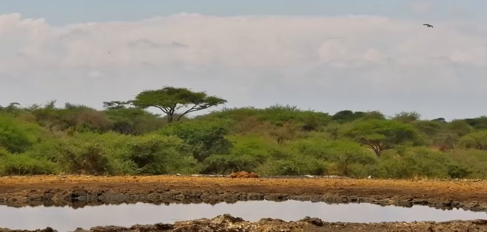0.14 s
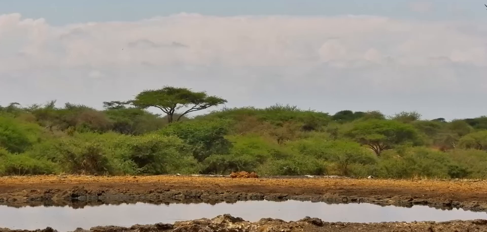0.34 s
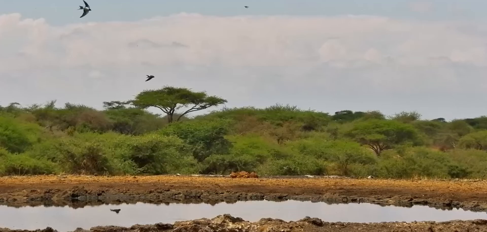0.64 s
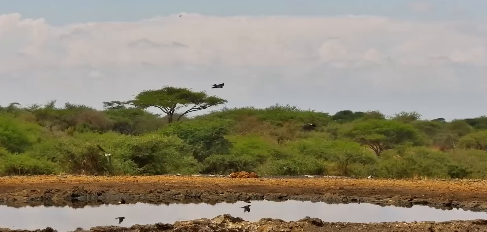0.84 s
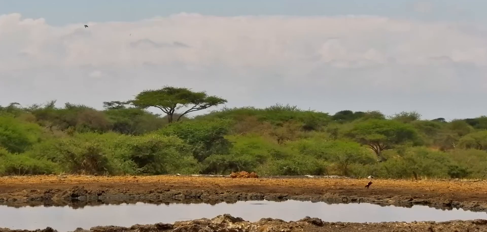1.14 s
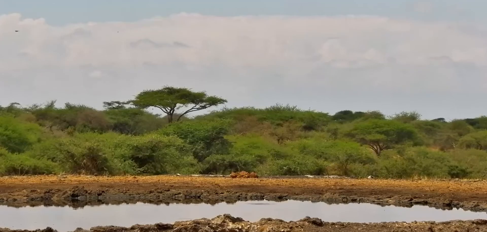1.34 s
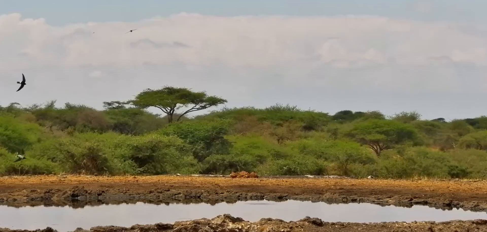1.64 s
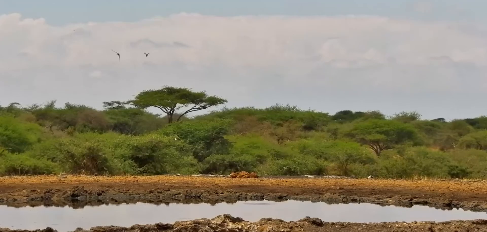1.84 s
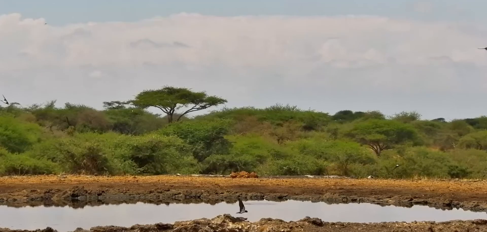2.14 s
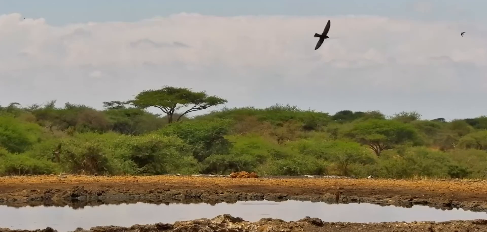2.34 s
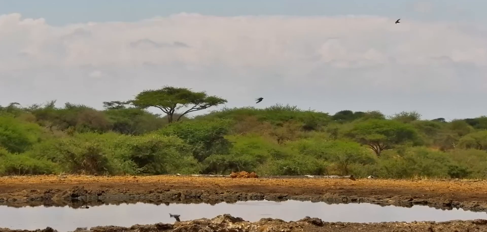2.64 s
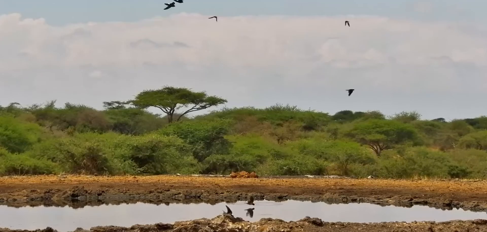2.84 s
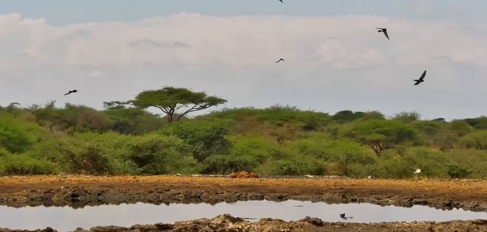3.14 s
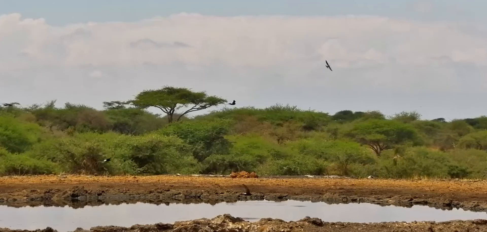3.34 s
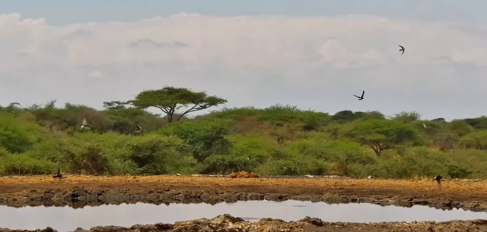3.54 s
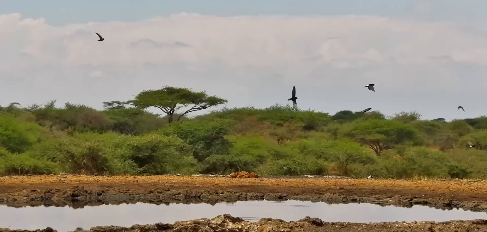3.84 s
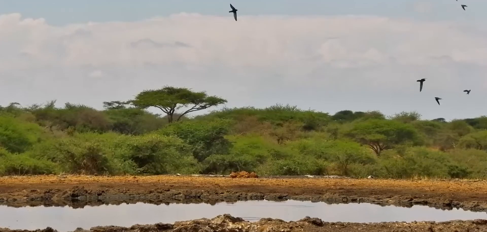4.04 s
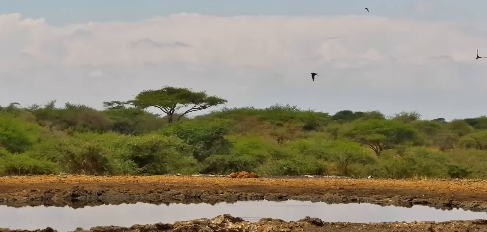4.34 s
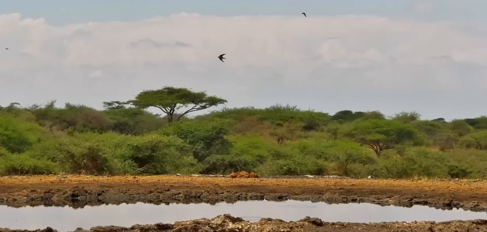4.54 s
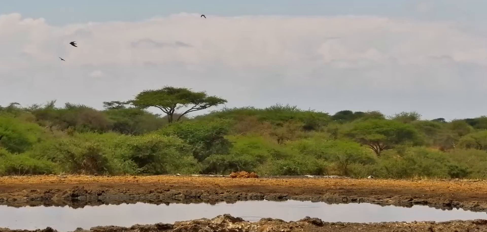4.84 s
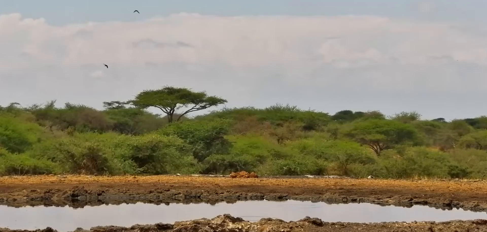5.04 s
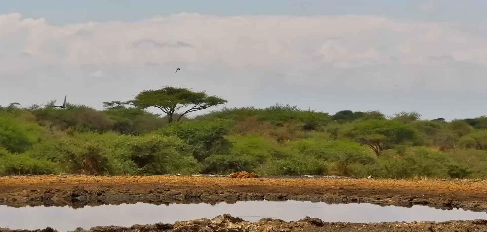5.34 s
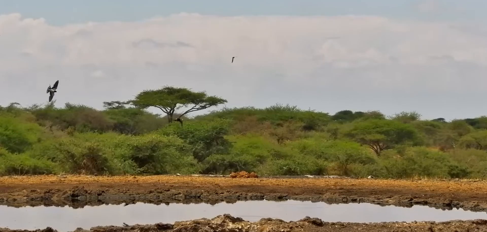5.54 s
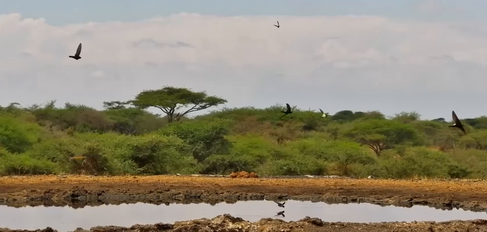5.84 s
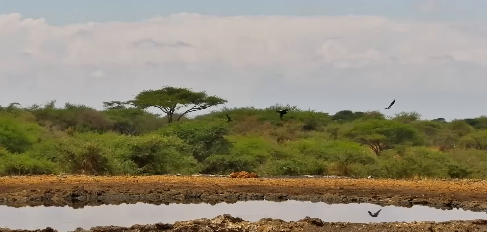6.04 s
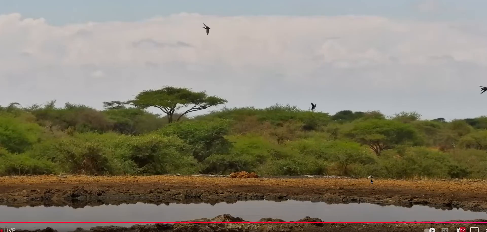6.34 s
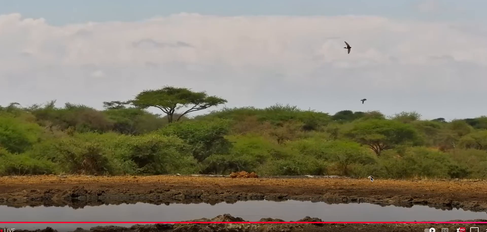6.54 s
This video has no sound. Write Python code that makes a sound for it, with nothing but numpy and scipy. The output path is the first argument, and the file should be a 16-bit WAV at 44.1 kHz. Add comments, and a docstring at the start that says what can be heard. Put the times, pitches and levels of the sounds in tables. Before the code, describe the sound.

Small swifts dash past close by with shrill, falling trills and soft wing flutters, over a gentle outdoor hiss in open bush.

```python
"""A waterhole in open bush: small swifts dash past the microphone, trilling. Each trill is a run of short
whistled notes, many hooking down at the end, some pure, some rasping; ground and bushes scatter them back.
Wings flutter close by as soft pushes of shaped noise, with small ticks and a bump or two of breeze.
A far bird gives two hoarse calls from across the water, made of sliding sines with shaky pitch.
Under it all lie a soft outdoor hiss of filtered noise and a faint mains hum of steady sines."""
import sys
import numpy as np
from scipy import signal
from scipy.fft import rfft, irfft
from scipy.io import wavfile

SR = 44100
rng = np.random.default_rng(int(sys.argv[2]) if len(sys.argv) > 2 else 0)


def unload_audio(sound):
    """Save the sound as a 16-bit wav file, at the path given as the first command line argument."""
    columns = np.transpose(np.atleast_2d(sound))
    # keep every value between -1 and 1, then stretch to whole-number steps
    steps = np.round(np.clip(columns, -1, 1) * 32767)
    wavfile.write(sys.argv[1], SR, steps.astype(np.int16))


N = 294984
TIME = np.arange(N) / SR
# whole-scene spectra are shaped on a longer grid
SIZE = 2 ** 19
FREQS = np.arange(SIZE // 2 + 1) * SR / SIZE


def undb(db):
    """Decibels to gain."""
    return 10 ** (np.asarray(db) / 20)


def unit(x):
    """Scale to rms 1."""
    return x / np.sqrt(np.mean(x ** 2) + 1e-18)


def add(track, start, sound):
    """Mix a sound in at a time in seconds."""
    i = max(int(start * SR), 0)
    track[i:i + len(sound)] += sound[:N - i]


def curve(points, hz):
    """Gain of a spectrum of (Hz, dB) points at given frequencies."""
    knots, db = np.transpose(points)
    return undb(np.interp(np.log(np.maximum(hz, 1)), np.log(knots), db))


def bells(bands):
    """Gain of a set of (Hz, width Hz, dB) peaks and dips."""
    return undb(sum(db * np.exp(-2 * ((FREQS - hz) / width) ** 2) for hz, width, db in bands))


def coloured(points):
    """Noise of rms 1 with a spectrum of (Hz, dB) points."""
    spectrum = rfft(rng.standard_normal(SIZE)) * curve(points, FREQS)
    return unit(irfft(spectrum)[:N])


def wobble(rate_hz):
    """Smooth random drift of rms 1, with little movement faster than the rate."""
    spectrum = rfft(rng.standard_normal(SIZE)) / (1 + (FREQS / rate_hz) ** 4)
    return unit(irfft(spectrum)[:N])


def swell(length):
    """A rounded rise and fall over a length in seconds."""
    return np.hanning(max(int(length * SR), 8))


def puffs(table, colour):
    """Soft rounded pushes of air, as (start_s, length_s, level_db) swells of coloured noise."""
    gate = np.zeros(N)
    for start, length, db in table:
        add(gate, start, undb(db) * swell(length))
    return gate * coloured(colour)


def outdoor_hiss(sway_db=1.27, ripple_db=2.4, ripple_hz=60):
    """Outdoor noise, its spectrum finely rippled by reflections round the microphone."""
    # broad spectrum of the open air: pitch_hz, level_db
    air_colour = [(20, -9.5), (45, -4), (130, 3), (220, -9), (560, -3), (1400, -8), (1750, -9), (2150, -8),
                  (2650, -2.5), (3500, -8), (4300, -12), (6000, -8), (7800, -31), (8700, -17), (11300, -18),
                  (12400, -42)]
    # narrow bands that stand out in the hiss: pitch_hz, width_hz, level_db
    air_bands = [(455, 30, 6), (550, 50, 6), (740, 70, 3), (975, 40, 3), (1110, 90, 3), (1365, 50, 4),
                 (1450, 30, 4), (2540, 60, 3.5), (2660, 30, 3), (2770, 40, 3.5), (2860, 70, 3.5),
                 (3140, 40, 4)]
    # strength of the hiss, before the random sway: time_s, level_db
    air_level = [(0, -53.6), (5.6, -54.1), (6.15, -52.7), (6.69, -53.3)]
    knots = np.arange(0, SR / 2, ripple_hz)
    # the ripple deepens up to 4 kHz
    ripple = np.interp(FREQS, knots, rng.standard_normal(len(knots))) * np.minimum(FREQS / 4000, 1)
    spectrum = rfft(coloured(air_colour), SIZE) * bells(air_bands) * undb(ripple_db * ripple)
    air = unit(irfft(spectrum)[:N])
    level_db = np.interp(TIME, *np.transpose(air_level)) + sway_db * wobble(3.56)
    return air * undb(level_db)


def mains_hum():
    """Steady sines at multiples of the mains frequency, each from a random phase."""
    # partials of the hum: pitch_hz, level_db
    partials = [(50, -101), (150, -65.5), (250, -69.5), (350, -69)]
    return sum(undb(db) * unit(np.sin(2 * np.pi * (hz * TIME + rng.random()))) for hz, db in partials)


def ticks(decay_s=0.017):
    """Small clicks: noise that starts abruptly and dies within a twentieth of a second."""
    # click onsets: start_s, level_db
    tick_times = [(0.082, -51), (0.64, -40.5), (5.75, -52.5)]
    # spectrum of the clicks: pitch_hz, level_db
    tick_colour = [(1500, -47), (2700, 3), (3700, 0), (4800, -3), (6500, -12), (11000, -59)]
    gate = np.zeros(N)
    for start, db in tick_times:
        add(gate, start, undb(db) * np.exp(-TIME[:SR // 20] / decay_s))
    return gate * coloured(tick_colour)


def scatter(note, share, spread_s=.009, count=6):
    """A bird on the wing is heard over a few extra paths, different for each note."""
    lags = rng.random(count)
    paths = np.zeros(int(spread_s * SR) + 40)
    paths[(lags * spread_s * SR).astype(int) + 30] = rng.standard_normal(count) * np.exp(-lags)
    paths *= share / np.linalg.norm(paths)
    # the direct path
    paths[0] = 1
    heard = signal.fftconvolve(note, paths)
    return heard * np.linalg.norm(note) / np.linalg.norm(heard)


def whistles(notes, octave_db, knee=.62, attack_s=0.00066, fade=0.14, jitter_hz=25, rasp_hz=320,
             scoop_hz=80, break_rough=0.7, smear=1.0, hook_octave_db=5, flutter=.65, hook_db=-4.5):
    """Each note glides, then hooks as the syrinx lets go; low pitches bring the octave into the throat's band."""
    # knee and fade are shares of a note; flutter is the strength shake of a fully rough note (natural log)
    # throat and beak pass the middle of the whistle best: pitch_hz, level_db
    throat = [(2000, -20), (2600, 3), (3300, -1.5), (4200, 2), (5200, 10.5), (6200, 2.5), (7000, -24),
              (7800, -19.5), (10500, -13), (12000, -24)]
    out = np.zeros(N)
    jitter, shimmer = wobble(450), np.tanh(wobble(700))
    for start, length, open_hz, mid_hz, close_hz, db, rough in notes:
        t = np.arange(int(length * SR)) / SR
        u = t / length
        here = slice(int(start * SR), int(start * SR) + len(t))
        hook = np.clip((u - knee) / (1 - knee), 0, 1)
        # the glide meets the opening pitch 18 % in and the middle pitch 52.5 % in
        glide = (np.minimum(u, knee) - .18) / 0.345
        hz = open_hz + (mid_hz - open_hz) * glide + (close_hz - mid_hz) * hook
        # the pitch scoops up as pressure builds
        hz = hz - scoop_hz * np.exp(-t / attack_s)
        # unsteady membranes shake both pitch and strength
        unsteady = np.minimum(rough + break_rough * hook, 1)
        shaken_hz = hz + (jitter_hz + rasp_hz * unsteady) * jitter[here]
        phase = 2 * np.pi * np.cumsum(shaken_hz) / SR
        attack = np.sin(np.pi / 2 * np.minimum(t / attack_s, 1)) ** 2
        effort = attack * np.clip((1 - u) / fade, 0, 1)
        effort = effort * np.exp(flutter * unsteady * shimmer[here]) * undb(hook_db * hook)
        fundamental = curve(throat, hz) * np.sin(phase)
        octave = undb(octave_db + hook_octave_db * hook) * curve(throat, 2 * hz) * np.sin(2 * phase)
        voice = fundamental + octave
        add(out, start, undb(db) * scatter(unit(effort * voice), smear * (rough + 0.6)))
    return out


def trill_notes(stray_pitch=0.0058, stray_db=0.58):
    """Most trills speed up as they run out; many turn from falling hooks towards level or rising slurs."""
    # one trill a row; gap, lead and hook blend from the first note to the last: start_s, end_s,
    # first_gap_s, last_gap_s, sounding_share_of_gap, first_lead, last_lead, first_hook, last_hook, roughness (0-1)
    # lead and hook are a note's opening and closing pitch as ratios to its middle pitch
    trill_rows = [(0.676, 1.188, .0478, .0262, .6, 1.02, 1.04, .78, .92, .28),
                  (0.813, 0.928, .0398, .0358, .42, 1.0, .99, .9, .95, .12),
                  (1.399, 1.873, .0517, .0273, .47, 1.06, .96, .64, 1.02, .2),
                  (2.263, 2.371, .055, .0505, .52, 1.11, .92, .66, .66, .2),
                  (2.42, 2.684, .044, .0215, .4, .97, 1.0, .6, .95, .2),
                  (3.017, 3.364, .0541, .0326, .4, 1.05, .94, .62, .9, .22),
                  (3.038, 3.272, .0569, .0338, .48, 1.0, 1.01, .96, .98, .25),
                  (3.176, 3.788, .0622, .0273, .52, 1.02, .88, .78, 1.02, .33),
                  (4.714, 4.999, .0572, .0355, .28, 1.12, .93, .85, .97, .22),
                  (5.208, 5.364, .038, .0413, .24, .98, .96, 1.03, 1.05, .12)]
    # one course per trill, same order: pitch mostly sinks as the breath runs out, level follows the fly-by
    # time_s, pitch_hz, level_db
    courses = [
        [(0.675, 4920, -32.5), (0.76, 4837, -26), (0.81, 4550, -50), (1.0, 4100, -37), (1.186, 3530, -50)],
        [(0.812, 3680, -37), (0.927, 3430, -39.5)],
        [(1.399, 4120, -33), (1.452, 4390, -24.5), (1.5, 4300, -26), (1.585, 4000, -30), (1.635, 3970, -24),
         (1.705, 3977, -23.5), (1.745, 3740, -30.5), (1.84, 3744, -28.5), (1.873, 3680, -35)],
        [(2.263, 3950, -27), (2.319, 4060, -31), (2.371, 4120, -25)],
        [(2.42, 4896, -15.5), (2.504, 4603, -21), (2.545, 4200, -27), (2.684, 3625, -27.5)],
        [(3.017, 4430, -31.5), (3.07, 4580, -26), (3.216, 3880, -33.5), (3.364, 3720, -39.5)],
        [(3.038, 5270, -36), (3.099, 4740, -30.5), (3.19, 4840, -32), (3.272, 4760, -32)],
        [(3.176, 4866, -29.5), (3.238, 4790, -31), (3.35, 4710, -31), (3.46, 4100, -37), (3.6, 3856, -39.5),
         (3.73, 3970, -38.5), (3.788, 3810, -48.5)],
        [(4.714, 3820, -45.5), (4.827, 3560, -39), (4.872, 3660, -48.5), (4.999, 3560, -52)],
        [(5.208, 4630, -30.5), (5.246, 4330, -35.5), (5.283, 4240, -35.5), (5.364, 3520, -52)],
    ]
    notes = []
    for row, course in zip(trill_rows, courses):
        start, end, first_gap, last_gap, share, *ratios, rough = row
        first_lead, last_lead, first_hook, last_hook = ratios
        times, pitches, levels = np.transpose(course)
        when = start
        for off_pitch, off_level in rng.standard_normal((24, 2)):
            if when > end + last_gap / 2:
                break
            blend = lambda first, last: np.interp(when, (start, end), (first, last))
            gap = blend(first_gap, last_gap)
            hz = np.interp(when, times, pitches) * (1 + stray_pitch * off_pitch)
            db = np.interp(when, times, levels) + stray_db * off_level
            open_hz = hz * blend(first_lead, last_lead)
            close_hz = hz * blend(first_hook, last_hook)
            notes.append((when, share * gap, open_hz, hz, close_hz, db, rough))
            when = when + gap
    return notes


def near_birds(trim_db=-1.04):
    """Swifts close to the microphone: trills and notes set one by one, whistled with a weak octave."""
    # notes set one by one: lone calls, and first, last or stray notes of trills; levels ahead of the trim:
    # start_s, length_s, open_hz, mid_hz, close_hz, level_db, roughness (0-1)
    single_notes = [(0.276, 0.018, 4410, 4490, 4270, -46.5, 0.6),
                    (0.601, 0.023, 4740, 4750, 4700, -46, 0.8), (0.633, 0.011, 4850, 5170, 5030, -42, 0.3),
                    (1.267, 0.057, 3860, 3790, 3720, -52, 0.03), (1.52, 0.022, 6000, 6070, 6170, -45, 0.11),
                    (1.579, 0.033, 5000, 5130, 5240, -41, 0.4), (2.201, 0.012, 5970, 6020, 6000, -25, 0.1),
                    (2.221, 0.0079, 3790, 3570, 2720, -25, 0.08),
                    (2.32, 0.018, 5265, 5186, 2560, -18, 0.17),
                    (2.706, 0.0079, 3700, 3720, 2650, -33.5, 0.7),
                    (3.009, 0.0065, 6050, 6150, 6100, -34, 0.05),
                    (4.009, 0.0197, 3120, 2760, 2520, -53, 0.03),
                    (4.22, 0.023, 3160, 2965, 2980, -49.5, 0.1), (5.152, 0.054, 4040, 4440, 3800, -51, 0.6),
                    (5.502, 0.011, 3900, 3800, 3550, -52.5, 0.3),
                    (5.548, 0.0083, 3480, 3370, 3320, -49, 0.1)]
    return undb(trim_db) * whistles(trill_notes() + single_notes, octave_db=-15)


def wings():
    """Wing strokes near the microphone push soft puffs of air at it."""
    # strokes: start_s, length_s, level_db
    strokes = [(0.679, 0.064, -50.5), (0.744, 0.083, -44), (1.414, 0.069, -49.5), (1.522, 0.07, -47.5),
               (2.066, 0.05, -49), (2.152, 0.066, -49), (2.688, 0.048, -56.5), (2.753, 0.1, -50.5),
               (3.272, 0.064, -52.5), (3.4, 0.025, -51.5), (3.91, 0.043, -57.5), (4.0, 0.048, -55.5),
               (4.522, 0.13, -57.5)]
    # spectrum of a stroke: pitch_hz, level_db
    wing_colour = [(40, -8), (130, -13), (350, 0.5), (550, -0.5), (900, -19.5), (1800, -13), (4000, -36)]
    return puffs(strokes, wing_colour)


def chase_notes(gap_s=.023, length_s=0.015, close_hz=3000, spread_db=2.0, rough=0.42):
    """Quick hooked notes of the farther birds, which sink and fade through each chase."""
    # chases: start_s, end_s, first_pitch_hz, last_pitch_hz, first_level_db, last_level_db
    chases = [(0.797, 1.204, 4620, 3775, -40.5, -56.5), (2.221, 2.437, 4485, 4410, -36, -44.5),
              (3.019, 3.394, 4506, 3904, -37, -45.5), (3.403, 3.776, 3946, 3356, -43, -52.5)]
    notes = []
    for start, end, first_hz, last_hz, first_db, last_db in chases:
        for when, (early, pitch, size) in zip(np.arange(start, end, gap_s), rng.standard_normal((80, 3))):
            along = (when - start) / (end - start)
            hz = (first_hz + along * (last_hz - first_hz)) * (1 + .05 * pitch)
            db = first_db + along * (last_db - first_db) + spread_db * size
            notes.append((when + .003 * early, length_s, hz, .87 * hz, close_hz, db, rough))
    return notes


def far_chases():
    """Farther birds joining a chase, whistled with a stronger octave than the near ones."""
    return whistles(chase_notes(), octave_db=-8.5)


def rasps(pulse_hz=420, pulse_decay=0.9):
    """Harsh buzzes in and after the trills: the syrinx chops the air into quick uneven puffs."""
    # buzzes: start_s, length_s, level_db
    buzzes = [(1.108, 0.11, -55.5), (1.331, 0.081, -49), (1.85, 0.087, -43), (2.306, 0.052, -46),
              (2.591, 0.054, -49.5), (2.9, 0.073, -59), (3.218, 0.093, -45.5), (3.673, 0.1, -43.5),
              (3.787, 0.047, -55)]
    # spectrum of the chopped air: pitch_hz, level_db
    rasp_colour = [(500, -17), (1000, -8.5), (1400, -4), (1900, -1.5), (2450, 4.5), (2900, 3), (4000, -15),
                   (6500, -66)]
    cycle = np.cumsum(pulse_hz * (1 + 0.089 * wobble(80))) / SR % 1
    gate = np.zeros(N)
    for start, length, db in buzzes:
        add(gate, start, undb(db) * np.sqrt(swell(length)))
    # pulse_decay is in cycles
    return gate * unit(coloured(rasp_colour) * np.exp(-cycle / pulse_decay))


def breeze():
    """Breeze bumping the microphone: short low thuds of air."""
    # bumps: start_s, length_s, level_db
    bumps = [(3.28, .14, -65), (5.68, .11, -67), (6.22, .13, -61)]
    # spectrum of a bump: pitch_hz, level_db
    bump_colour = [(20, -13), (40, 12), (65, 2), (130, -41), (400, -32), (1500, -60)]
    return puffs(bumps, bump_colour)


def far_bird(hoarse_hz=65):
    """Short slurs from across the water, hoarse because their pitch shakes."""
    # slurs, the last two overlapping: start_s, length_s, open_hz, close_hz, level_db
    slurs = [(6.07, 0.069, 1124, 1030, -51.5), (6.483, 0.061, 990, 1095, -58),
             (6.526, 0.059, 1386, 1300, -56)]
    out, jitter = np.zeros(N), wobble(210)
    for start, length, open_hz, close_hz, db in slurs:
        shape = swell(length)
        shake = jitter[int(start * SR):][:len(shape)]
        hz = np.linspace(open_hz, close_hz, len(shape)) + hoarse_hz * shake
        add(out, start, undb(db) * shape * unit(np.sin(2 * np.pi * np.cumsum(hz) / SR)))
    return out


def outdoors(x, ground_db=-14, ground_s=0.0027, near_db=-10, bush_db=-19):
    """A ground echo that shifts as the birds move, quick scatter from nearby things, a thin tail from the bush."""
    lag = ground_s * (1 + 0.188 * wobble(1.17))
    out = x + undb(ground_db) * np.interp(TIME - lag, TIME, x)
    t = TIME[:SR // 2]
    # t60: time in seconds for the tail to fall 60 dB
    for db, t60, delay in ((near_db, .19, .004), (bush_db, .42, .02)):
        echo = rng.standard_normal(len(t)) * undb(-60 * t / t60) * (t > delay)
        out = out + undb(db) * signal.fftconvolve(x, echo / np.linalg.norm(echo))[:N]
    return out


def scene():
    """Birds and ticks echo in the open air; wings, breeze, hiss and hum join without echo."""
    birds = near_birds() + far_chases() + rasps() + far_bird() + ticks()
    mix = outdoors(birds) + wings() + breeze() + outdoor_hiss() + mains_hum()
    return mix[None]


def record(dry, top_hz=11750):
    # dips and peaks of the chain: pitch_hz, width_hz, level_db
    chain_colour = [(450, 109, -7.5), (871, 73, -8.5), (1679, 83, -18), (1847, 36, -37), (2075, 190, -7),
                    (5788, 220, -23.5), (5830, 300, 2), (6400, 185, -9), (9570, 360, -6.5),
                    (10830, 230, -9.5)]
    # fold the cepstrum so the ringing comes only after the sound (minimum phase)
    cepstrum = irfft(np.log(bells(chain_colour)))
    cepstrum[1:SIZE // 2] *= 2
    cepstrum[SIZE // 2 + 1:] = 0
    heard = irfft(rfft(dry, SIZE) * np.exp(rfft(cepstrum)))[:, :N]
    return signal.sosfilt(signal.ellip(8, .2, 70, top_hz, fs=SR, output="sos"), heard)


dry = scene()
out = record(dry)
unload_audio(out)
```